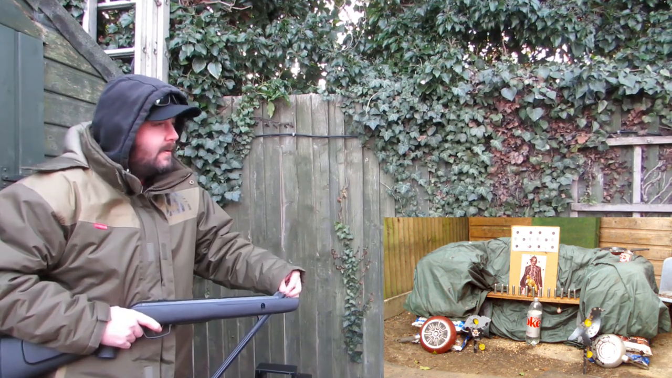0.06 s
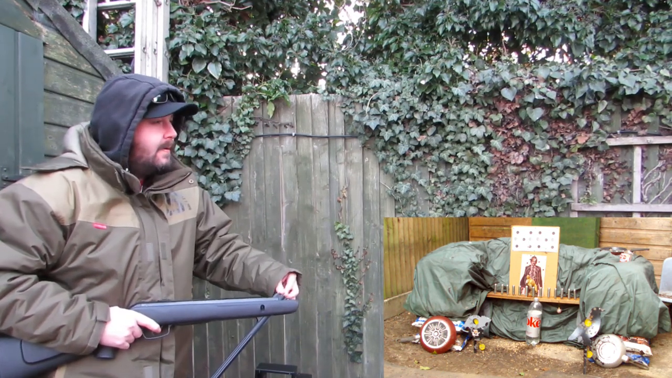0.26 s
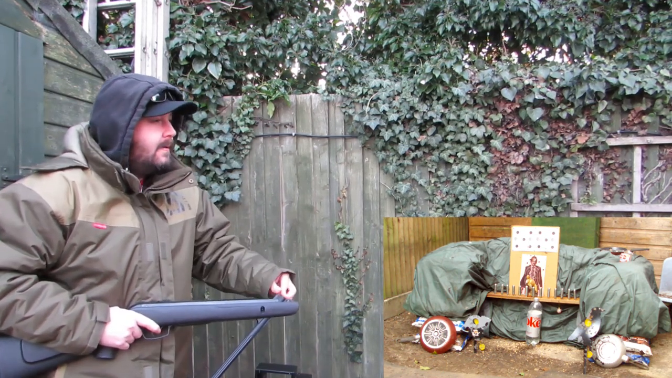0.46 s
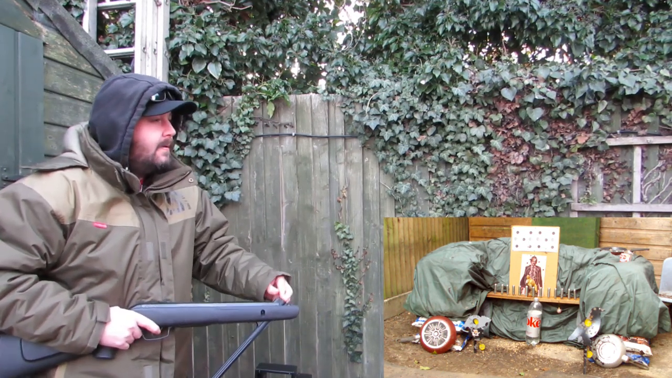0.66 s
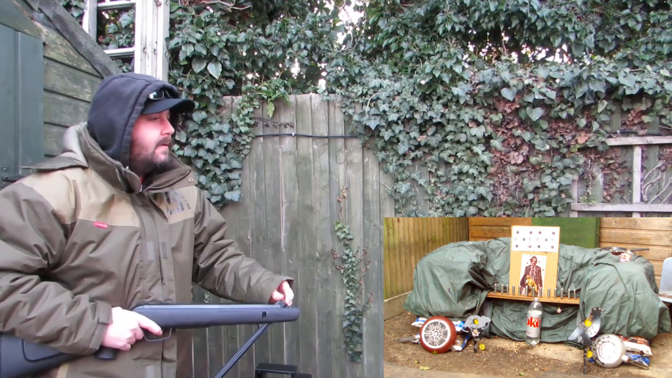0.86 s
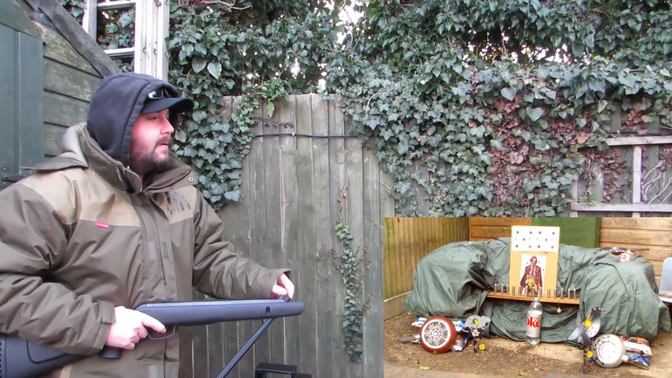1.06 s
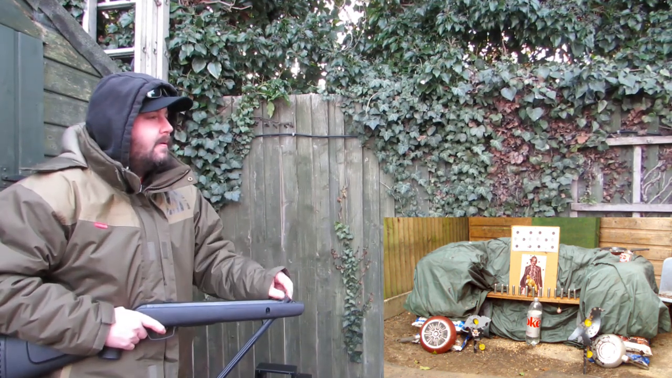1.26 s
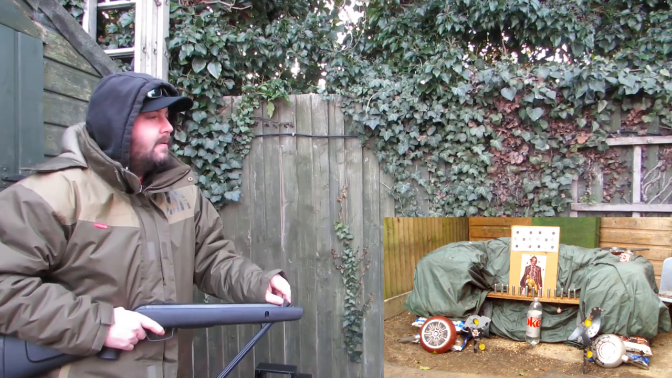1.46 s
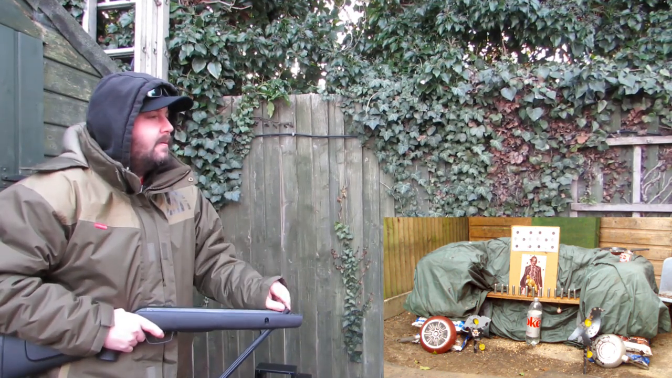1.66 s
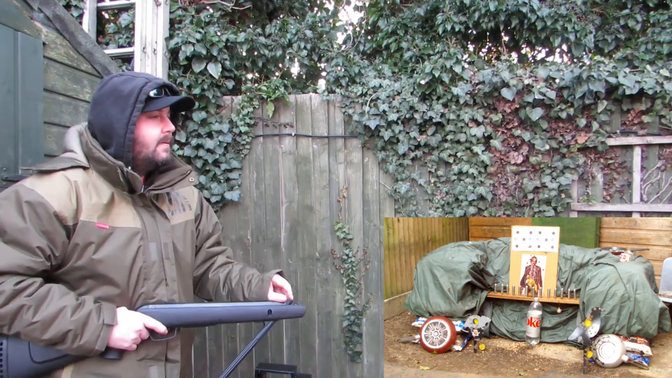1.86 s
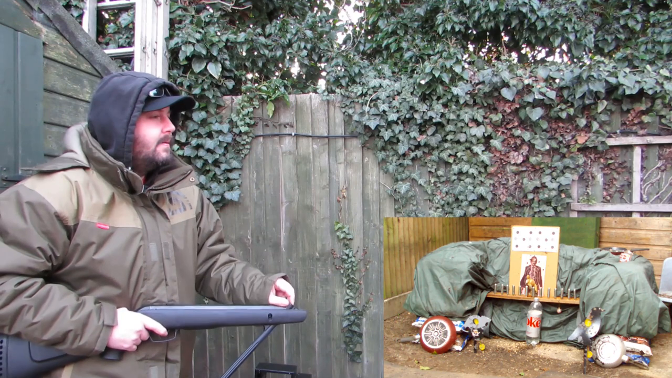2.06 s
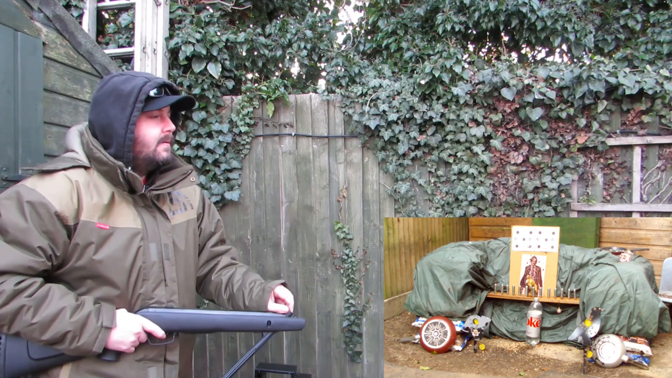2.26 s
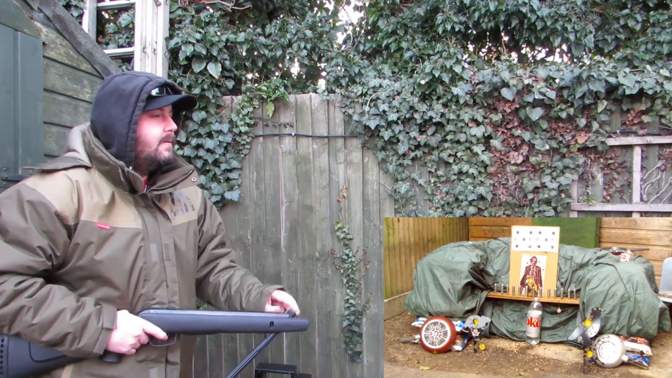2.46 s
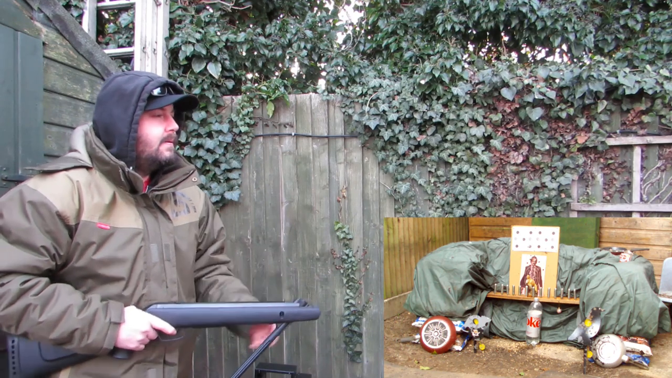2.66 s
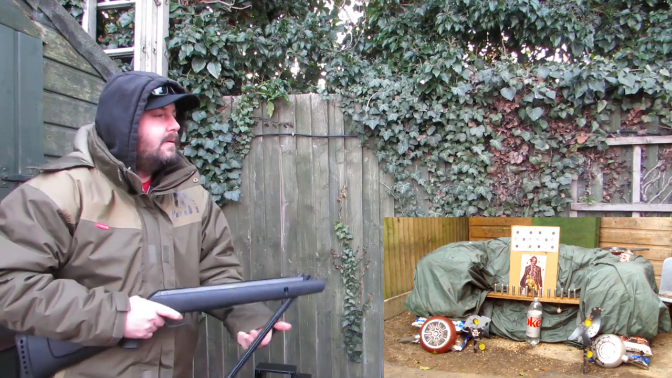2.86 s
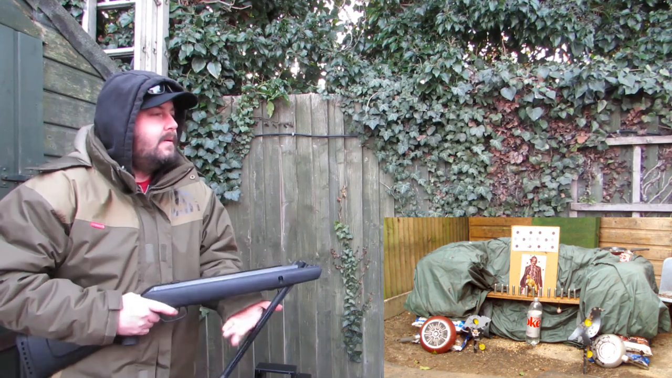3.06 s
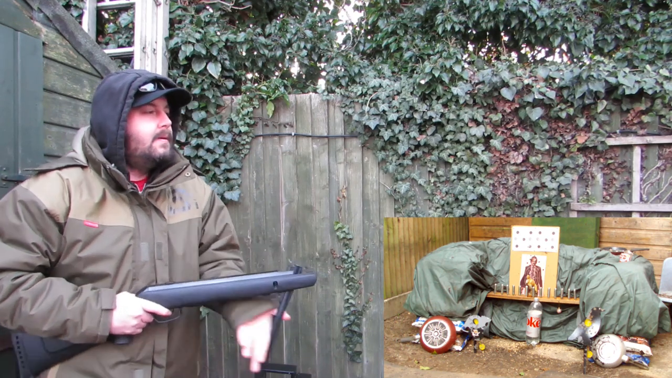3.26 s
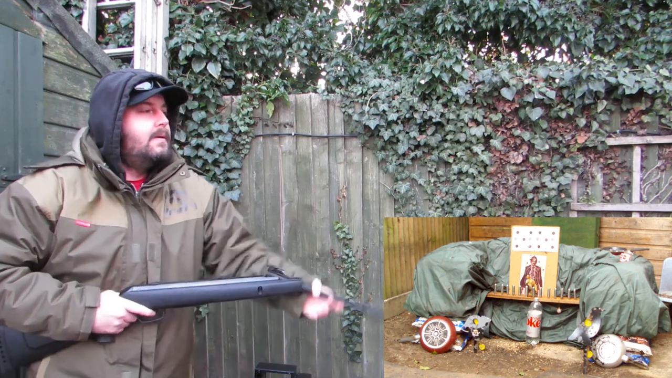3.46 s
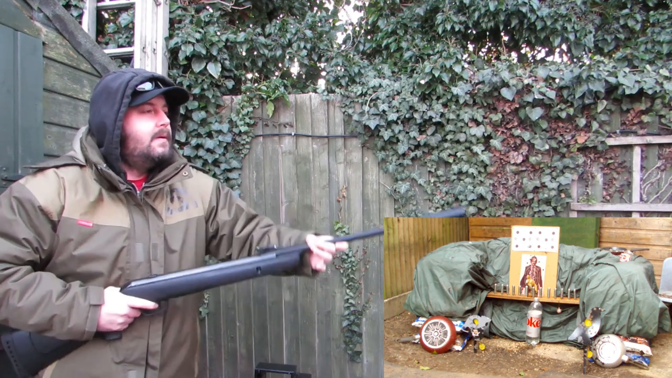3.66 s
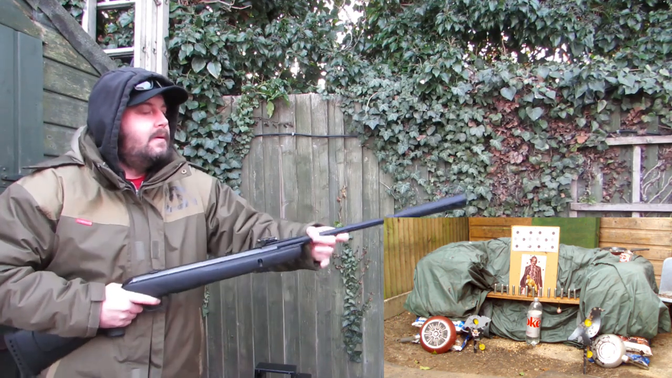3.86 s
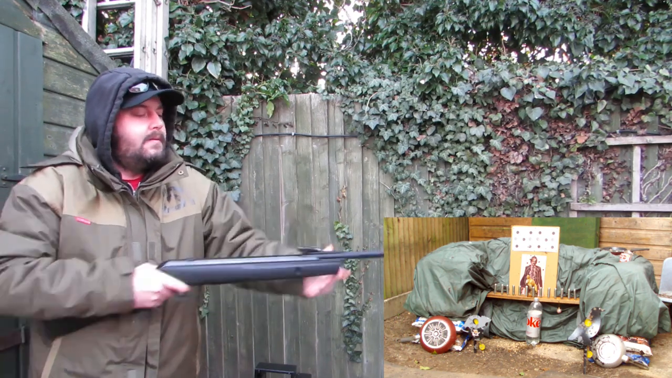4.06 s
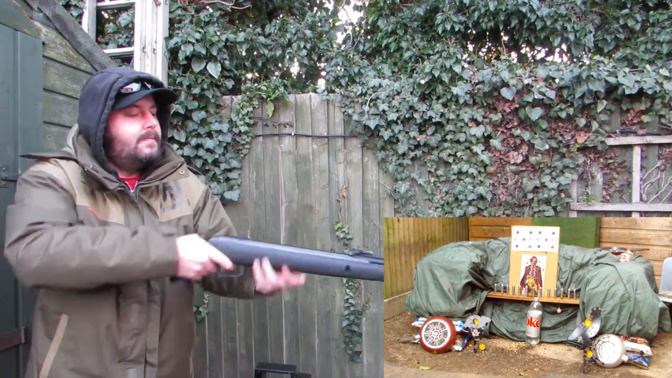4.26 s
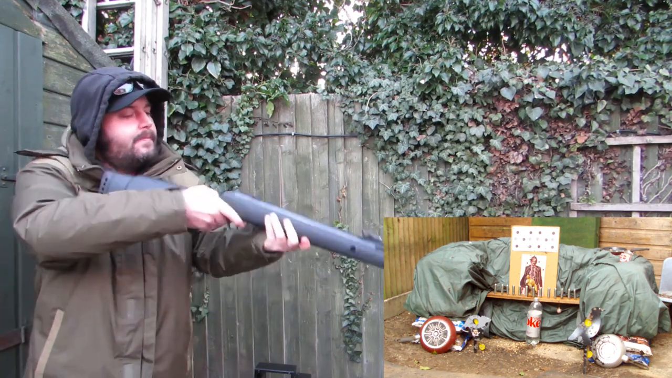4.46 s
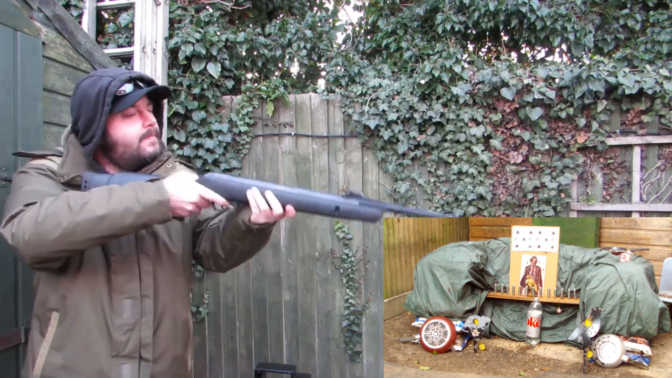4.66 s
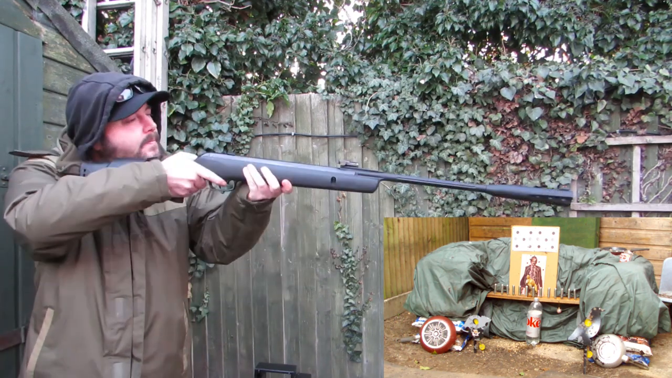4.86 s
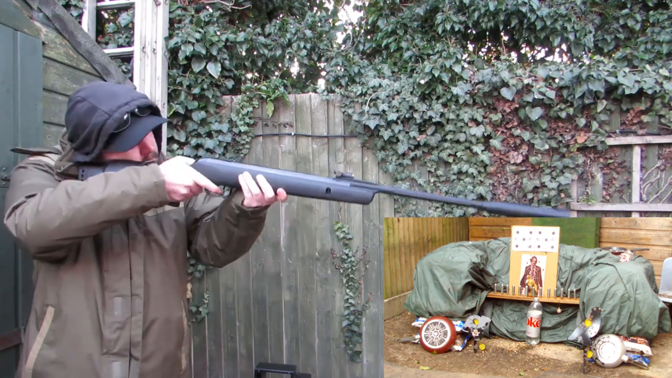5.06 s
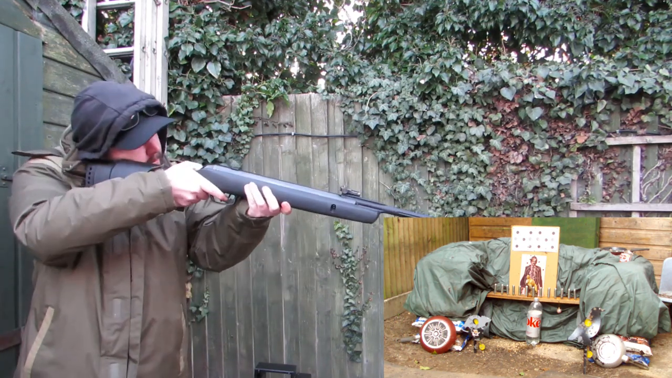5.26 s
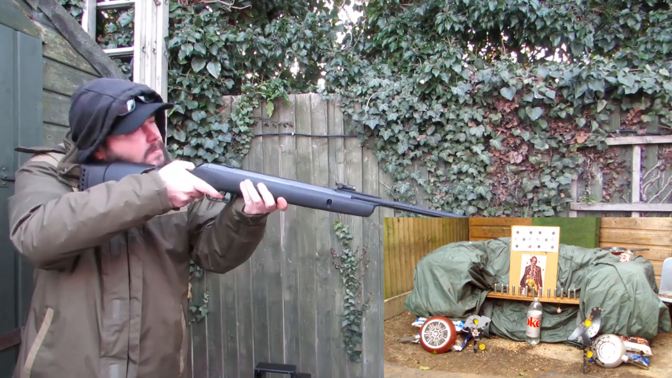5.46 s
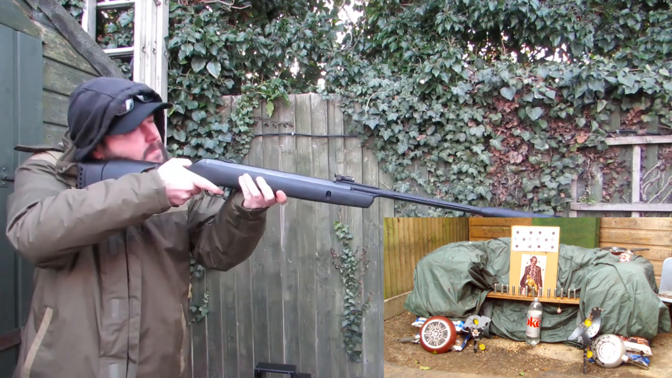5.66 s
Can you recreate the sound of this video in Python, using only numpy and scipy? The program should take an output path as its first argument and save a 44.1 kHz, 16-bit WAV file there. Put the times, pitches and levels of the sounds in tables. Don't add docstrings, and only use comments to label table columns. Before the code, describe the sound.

Outdoors in a garden, close to a stereo microphone, fingers make faint dry ticks and sleeve rubs while loading a pellet. A little after three seconds the air rifle barrel scrapes and rattles shut, ending in a loud steel latch snap. Nylon jacket swishes follow and the stock knocks softly on the shoulder. Low traffic rumble and a few falling bird whistles sit far behind; no shot is fired.

```python
import sys
import numpy as np
from scipy import signal
from scipy.fft import rfft, irfft, next_fast_len
from scipy.io import wavfile
from scipy.ndimage import map_coordinates

SR = 44100
rng = np.random.default_rng(int(sys.argv[2]) if len(sys.argv) > 2 else 0)


def invert_db(x):
    u = np.asarray(x, float) / 20
    return 10 ** u


def generate_wav(signal):
    frames = np.transpose(np.atleast_2d(signal))
    scaled = np.clip(frames, -1, 1) * 32767
    pcm = np.round(scaled).astype(np.int16)
    wavfile.write(sys.argv[1], SR, pcm)


N = 251811


def unit(x):
    return x / np.sqrt(np.mean(x ** 2) + 1e-20)


def along(points, hz):
    f, value = np.transpose(points)
    return np.interp(np.log(hz + 1), np.log(f + 1), value)


def wobble(count):
    knots = rng.standard_normal(int(N * count / SR) + 4)
    return map_coordinates(knots, [np.arange(N) * count / SR])


def filtered(x, response):
    m = next_fast_len(N + SR // 8, real=True)
    return irfft(rfft(x, m) * response(np.fft.rfftfreq(m, 1 / SR)), m)[..., :N]


def coloured(x, spectrum):
    return filtered(x, lambda hz: invert_db(along(spectrum, hz)))


def ringing(x, modes):
    def response(f):
        total = 0
        for k, (centre, width, db) in enumerate(modes):
            damping = 1j * f * width
            total = total + (-1) ** k * invert_db(db) * damping / (centre ** 2 - f ** 2 + damping)
        return total
    return filtered(x, response)


def grainy(grain_db, count):
    return unit(invert_db(grain_db * wobble(count)) * rng.standard_normal((2, N)))


def specks(count, spread_db):
    chance, size = rng.random(N), rng.exponential(size=N)
    hits = (chance < count / SR) * invert_db(spread_db * np.minimum(size, 3))
    life = invert_db(-60 * np.arange(SR // 200) / SR / 0.0023)
    return unit(signal.fftconvolve(hits, life)[:N] * rng.standard_normal((2, N)))


def bursts(times, dbs, t60s):
    out = np.zeros((2, N + SR))
    t = np.arange(SR // 16) / SR
    for s, db, t60 in np.broadcast(times, dbs, t60s):
        puff = invert_db(db - 60 * t / t60) * rng.standard_normal((2, len(t)))
        out[:, round(s * SR):][:, :len(t)] += puff
    return out[:, :N]


def spikes(times, dbs):
    out = np.zeros((2, N))
    out[:, np.round(times * SR).astype(int)] = invert_db(dbs)
    return out


def strokes(rows):
    t = np.arange(N) / SR
    roundness = 1.454
    gain = 0
    for s, db, rise, fall in rows:
        distance = np.abs((t - s) / np.where(t < s, rise, fall))
        gain = gain + invert_db(db - 20 * distance ** roundness)
    return gain


def curves(rows, fade=0.044):
    s, first, *rest = np.transpose(rows)
    t = np.arange(N) / SR
    outside = np.maximum(s[0] - t, 0) + np.maximum(t - s[-1], 0)
    return [np.interp(t, s, first) - 40 * outside / fade] + [np.interp(t, s, c) for c in rest]


# f/Hz, density/dB
RUMBLE_TONE = [(12, -25), (20, -1), (38, 2), (54, 1), (130, -19.5), (170, -45), (290, -120)]
# f/Hz, density/dB
HUSH_TONE = [(65, -34), (110, -8.5), (158, -4), (263, -3.5), (682, -11.5), (963, -9), (2650, -29),
             (8610, -25.5), (9920, -29), (11700, -19), (12900, -58), (14000, -79)]
# f/Hz, density/dB
HUSH_SIDE_TONE = [(18, -40), (30, -14), (206, -10.5), (399, -7.5), (480, 4), (533, -5), (752, -3),
                  (2000, -17.5), (3970, -24.5), (10500, -17), (14100, -28), (16500, -66)]
# f/Hz, level/dB
DISTANCE_LOSS = [(1200, 1), (2500, 1), (10000, -6.5), (13000, -15)]


def background():
    t = np.arange(N) / SR
    rumble_db = -40 + 0.27 * t
    rumble_db = rumble_db + 0.5 * wobble(count=2) + 1 * wobble(count=9)
    rumble, stray = invert_db(rumble_db) * unit(coloured(rng.standard_normal((2, N)), RUMBLE_TONE))
    drift = invert_db(0.09 * wobble(count=2) + 0.14 * wobble(count=8) + 1.0 - 0.39 * t)
    far = filtered(rng.standard_normal(N), lambda hz: invert_db(along(HUSH_TONE, hz) + along(DISTANCE_LOSS, hz)))
    hush = invert_db(-50.5) * drift * unit(far)
    side = invert_db(-51.5) * drift * unit(coloured(rng.standard_normal(N), HUSH_SIDE_TONE))
    side = side + 0.0077 * hush + invert_db(-25.0) * stray
    return np.array([rumble + hush + side, rumble + hush - side])


# t/s, snap peak level/dB, dull part level/dB
FIND_PELLET = [(0.0273, -38.5, -5.5), (0.0592, -33, -9.5), (0.1898, -44.5, -9), (0.232, -35, -7),
               (0.2556, -42, -7), (0.2782, -36, -4.5), (0.3346, -38, -11), (0.3827, -45.5, 5.5),
               (0.5184, -35.5, -7.5), (0.551, -40, -6), (0.5708, -26, -19), (0.5904, -38, 6),
               (0.5948, -37, 1.5), (0.604, -26, -19), (0.6248, -31.5, -13), (0.6575, -27.5, -18),
               (0.6626, -31, -14), (0.6704, -28, -18), (0.6854, -34, -19), (0.697, -38, -8),
               (0.7172, -33, -9), (0.7395, -29, -24), (0.752, -29, -17), (0.7697, -26, -30)]
# t/s, snap peak level/dB, dull part level/dB
TURN_PELLET = [(0.857, -39, -17), (0.891, -31, -21), (0.9083, -27, -17.5), (0.9175, -20, -26),
               (0.9374, -24.5, -13.5), (0.9713, -30, -16), (0.9845, -29, -11), (1.0176, -30, -21),
               (1.041, -38, -9), (1.0784, -44, 1), (1.3758, -47, -9), (1.463, -40, -9), (1.496, -37, -10.5),
               (1.5209, -34, -6), (1.5436, -31, -19), (1.575, -31, -19), (1.5884, -26.5, -19),
               (1.619, -28, -19), (1.6472, -31, -14), (1.7305, -39, -17), (1.7711, -28.5, -18),
               (1.7904, -38, -19), (1.809, -40, -13), (1.8238, -29, -17), (1.8397, -30, -11),
               (1.8764, -35.5, -7), (1.8988, -34.5, -11)]
# t/s, snap peak level/dB, dull part level/dB
PRESS_HOME = [(2.0168, -43.5, -7), (2.03, -34.5, -8), (2.0692, -32, -8.5), (2.1086, -34, -15),
              (2.1313, -31, -14), (2.1836, -33.5, -20), (2.237, -31.5, -22), (2.2633, -35.5, -18),
              (2.282, -35, -19), (2.3221, -32, -16), (2.3608, -31, -16), (2.381, -38.5, -9),
              (2.4114, -27, -16), (2.4219, -29.5, -23), (2.5113, -31, -11), (2.525, -36, -12)]
# peak t/s, level/dB, rise t/s, fall t/s
SLEEVE_RUBS = [(.04, -57, 0.029, 0.063), (.27, -56, .1, 0.027), (.35, -52, 0.056, 0.071),
               (.6, -51, .1, 0.057), (.68, -52.5, 0.042, 0.16), (.77, -50, 0.14, 0.056),
               (.91, -44.5, 0.022, 0.11), (1.0, -51, 0.14, 0.23), (1.13, -68, 0.11, 0.17),
               (1.36, -62, 0.17, .25), (1.56, -52.5, 0.045, 0.1), (1.66, -50, 0.22, 0.025),
               (1.82, -44, 0.13, 0.12), (2.07, -50, 0.054, 0.21), (2.3, -56, 0.085, 0.12),
               (2.41, -53.5, 0.086, 0.045)]
# f/Hz, level/dB
SNAP_TONE = [(3500, -32), (6000, -5), (9000, 0), (12000, -3.5), (14000, -11.5), (16000, -16)]
# f/Hz, level/dB
BODY_TONE = [(900, -10), (2000, -7), (3800, -2), (5000, -4.5), (7000, -39.5)]


def pellet():
    texture = grainy(grain_db=4.5, count=400) + invert_db(-10.5) * specks(count=150, spread_db=1.5)
    grit = strokes(SLEEVE_RUBS) * texture
    s, db, dull_db = np.transpose(list(FIND_PELLET) + list(TURN_PELLET) + list(PRESS_HOME))
    snap = spikes(s + 0.00055, db + 11.5)
    snap = snap + bursts(s + 0.0006, db - 5.5, t60s=0.016) + invert_db(4) * grit
    knock_db = db + dull_db + 14.5
    knock = spikes(s + 0.00048, knock_db + 7)
    knock = knock + bursts(s + 0.0006, knock_db, t60s=0.0066) + invert_db(5.5) * grit
    return coloured(snap, SNAP_TONE) + coloured(knock, BODY_TONE)


# t/share of length, f/Hz, level/dB
WHISTLE = [
    (0, 7800, 15),
    (.15, 7750, -5),
    (0.501, 6960, -2.5),
    (.85, 5730, 2),
    (1, 5140, -1),
]
# t/s, full length/s, pitch factor, level/dB
BIRD_CALLS = [
    (0.078, 0.07, 0.95, -59),
    (1.065, .2, 1.03, -60),
    (1.21, 0.084, 1.0, -54),
    (1.684, .085, 0.98, -55.5),
    (4.535, 0.095, 1.0, -56),
]


def bird():
    out = np.zeros(N + SR)
    share, hz, shape_db = np.transpose(WHISTLE)
    for s, length, pitch, db in BIRD_CALLS:
        u = np.arange(int(min(length, 0.085) * SR)) / SR / length
        unsteady = 1 + 0.012 * wobble(count=300)[:len(u)]
        glide = pitch * np.interp(u, share, hz) * unsteady
        tone = np.sin(2 * np.pi * np.cumsum(glide) / SR)
        gain = invert_db(db + np.interp(u, share, shape_db)) * signal.windows.tukey(len(u), 0.2)
        out[round(s * SR):][:len(u)] += gain * tone
    out = out + invert_db(-12) * np.roll(out, round(0.02 * SR))
    return np.array([out[:N], np.roll(out, 3)[:N]])


# peak t/s, level/dB, rise t/s, fall t/s
ARM_STROKES = [(2.52, -56.5, 0.022, 0.13), (2.65, -43.5, 0.11, 0.24), (2.87, -56, 0.12, 0.19),
               (3.07, -63.5, .06, 0.13), (3.28, -50.5, .12, 0.23), (3.49, -48, 0.068, 0.12),
               (3.565, -55, 0.047, 0.025), (3.63, -43, 0.02, 0.13), (3.99, -47.5, 0.13, 0.13),
               (4.11, -38, 0.18, 0.21), (4.38, -44, 0.31, 0.23), (4.63, -54.5, 0.072, 0.15),
               (4.8, -53.5, 0.11, 0.27), (5.08, -61, 0.083, 0.068), (5.2, -60.5, 0.077, 0.14),
               (5.39, -57.5, 0.2, 0.47)]
# f/Hz, density/dB
NYLON_TONE = [(710, -27), (1200, -4), (7910, -6), (9610, -9.5), (12600, -5.5), (14700, -28), (15500, -30),
              (16000, -71)]
# f/Hz, density/dB
PADDING_TONE = [(110, 4), (200, -1), (600, 2), (1200, -1), (2200, -13.5)]


def jacket():
    fibres = grainy(grain_db=1.0, count=200) + invert_db(-13.5) * specks(count=400, spread_db=3.5)
    padding = invert_db(-1.5) * unit(coloured(grainy(grain_db=0.0, count=60), PADDING_TONE))
    return strokes(ARM_STROKES) * (unit(coloured(fibres, NYLON_TONE)) + padding)


# t/s, level/dB, stock level/dB
BARREL_SWING = [
    (3.25, -58, -13),
    (3.35, -29.5, -5),
    (3.402, -29, -11),
    (3.432, -37, -8),
    (3.48, -46, -9),
]
# t/s, peak level/dB
STEEL_CONTACTS = [(3.2806, -34), (3.2976, -41), (3.313, -21.5), (3.324, -17), (3.3416, -16.5),
                  (3.3674, -11.5), (3.3849, -13), (3.4019, -11), (3.4166, -5), (3.426, -16), (3.4459, -17),
                  (3.5215, -25), (3.5437, -30), (3.5588, -25), (3.5994, -3), (3.604, -10.5), (3.607, -17)]
# f/Hz, width f/Hz, level/dB
STEEL_MODES = [(2020, 380, -8), (2415, 145, -0.5), (3020, 300, -3.5), (4090, 890, -4.5), (4630, 350, 3.5),
               (5360, 670, 0.5), (6770, 1200, -3), (7750, 790, 0.5), (9040, 800, -4.5), (10840, 2200, -8.5)]
# f/Hz, level/dB
STEEL_LOSS = [(12000, 0), (13500, -2), (14500, -20)]
# f/Hz, width f/Hz, level/dB
STOCK_MODES = [(448, 194, -0.5), (622, 164, 1.5), (866, 83, -8), (1051, 86, 0), (1630, 1240, -5.5)]


def action():
    level_db, stock_db = curves(BARREL_SWING)
    grind = invert_db(np.minimum(level_db, -29) + 6.0) * grainy(grain_db=3, count=300)
    hollow = invert_db(level_db + stock_db + 17.5) * grainy(grain_db=1.5, count=150)
    s, db = np.transpose(STEEL_CONTACTS)
    crack = spikes(s + 0.0011, 2.26 * db + 22) + bursts(s + 0.0011, 1.5 * db + 7, t60s=0.0035)
    rattle = bursts(s + 0.0011, db - 4.0, t60s=0.022)
    knock = bursts(s + 0.00074, 0.2 * db - 17, t60s=0.064)
    edge = invert_db(-28) * np.diff(crack, prepend=0)
    steel = coloured(ringing(grind + crack + rattle, STEEL_MODES), STEEL_LOSS)
    return edge + steel + ringing(hollow + knock, STOCK_MODES)


# t/s, peak level/dB
STOCK_KNOCKS = [
    (3.544, -31),
    (3.6175, -23.5),
    (3.629, -26.5),
    (4.237, -34),
    (4.566, -39),
    (4.599, -29.5),
    (4.637, -37),
    (4.656, -28),
    (4.689, -51),
]


def shoulder():
    s, db = np.transpose(STOCK_KNOCKS)
    touch = bursts(s + 0.00174, db + 12.5, t60s=0.018) + spikes(s + 0.0014, db + 25.5)
    return ringing(touch, list(STOCK_MODES) + [(2050, 1020, -6), (250, 140, -13)])


# f/Hz, t60/s
GARDEN_DECAY = [(300, 0.32), (3000, 0.39), (12000, 0.12)]


def garden(pair):
    hz, t, z = signal.stft(rng.standard_normal((2, SR // 3)), SR, nperseg=256)
    fading = invert_db(-60 * t / along(GARDEN_DECAY, hz)[:, None])
    tail = signal.istft(z * fading, SR, nperseg=256)[1]
    late = np.pad(pair[0], (300, 0))[None]
    return signal.fftconvolve(late, tail / np.linalg.norm(tail[0]), axes=1)[:, :N]


def ports(pair, wide, alike, lean):
    turn = np.array([[1j * alike], [np.sqrt(1 - alike ** 2)]])
    side = filtered(pair, lambda hz: turn * invert_db(along(wide, hz))).sum(axis=0) + lean * pair[0]
    return np.array([pair[0] + side, pair[0] - side])


# f/Hz, level/dB
RIFLE_WIDTH = [(60, -15), (150, 6), (380, -15), (950, -9), (2380, -5), (5980, -3), (15000, 6)]
# f/Hz, level/dB
HAND_WIDTH = [(60, -23), (150, -13), (380, -9), (950, -14), (2380, -6), (5980, 2.5), (15000, 11)]
# f/Hz, level/dB
JACKET_WIDTH = [(60, -21), (150, -13), (380, -16), (950, -10), (2380, -3.5), (5980, 3.5), (15000, 10.5)]


def scene():
    rifle = action() + shoulder()
    small = pellet() + bird()
    near = ports(rifle, RIFLE_WIDTH, alike=0.97, lean=0.2) + ports(small, HAND_WIDTH, alike=1.0, lean=0.44)
    echo = garden(invert_db(-12.5) * rifle + invert_db(-14) * small)
    return near + ports(jacket() + echo, JACKET_WIDTH, alike=0.44, lean=0.31) + background()


# f/Hz, level/dB
MIC_TONE = [(20, 0), (14000, 0), (14900, 1.5), (15400, -20), (16600, -30), (16700, -120)]


def band_limit(x):
    return signal.sosfilt(signal.butter(12, 16650, fs=SR, output="sos"), x)


# f/Hz, level/dB
MIC_TONE = [(20, 0), (14000, 0), (14900, 1.5), (15400, -20), (16600, -30), (16700, -120)]


def record(dry):
    mix = np.clip(coloured(dry, MIC_TONE), -1, 1)
    return band_limit(mix)


dry = scene()
out = record(dry)
generate_wav(out)
```